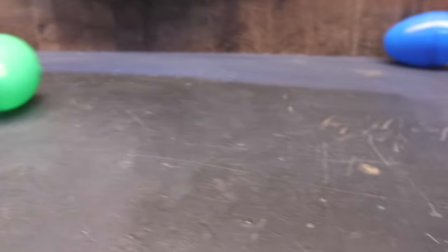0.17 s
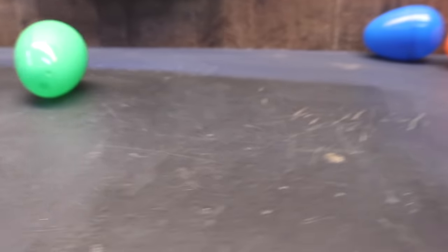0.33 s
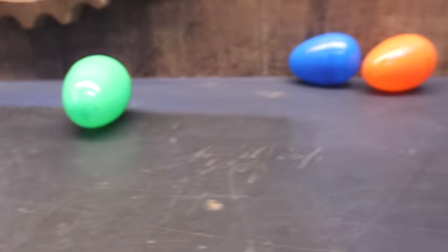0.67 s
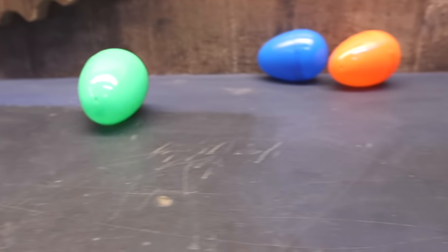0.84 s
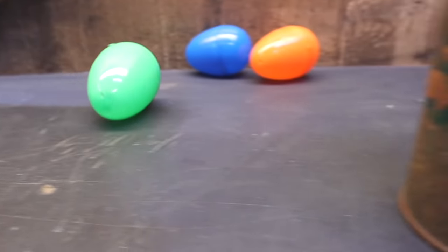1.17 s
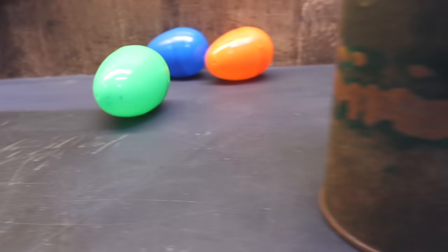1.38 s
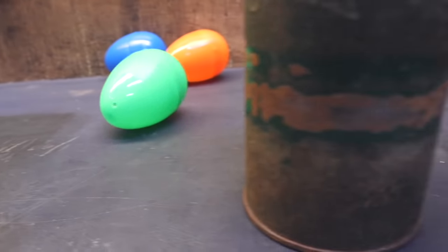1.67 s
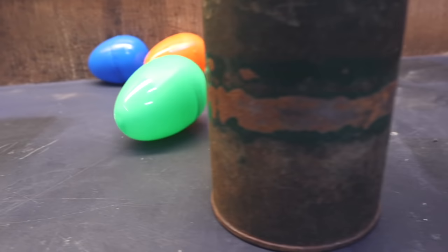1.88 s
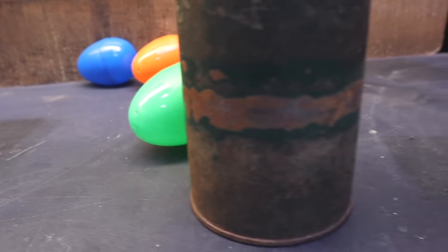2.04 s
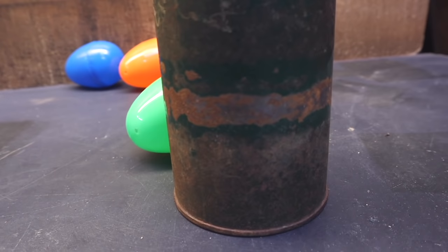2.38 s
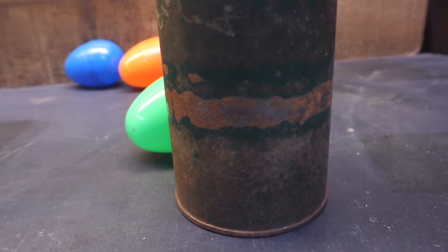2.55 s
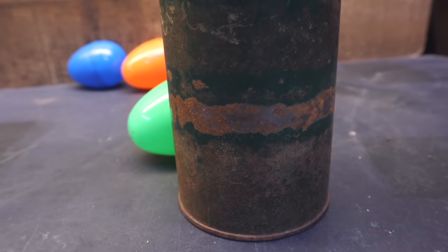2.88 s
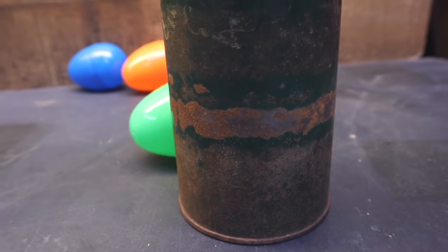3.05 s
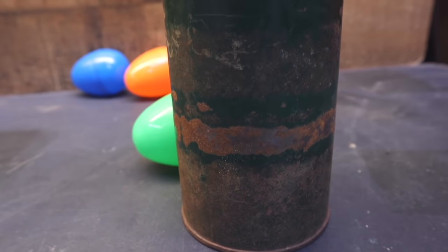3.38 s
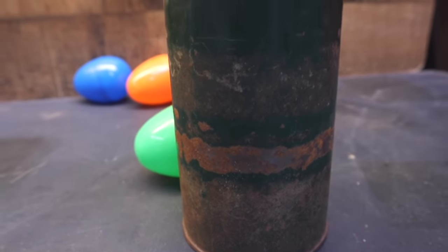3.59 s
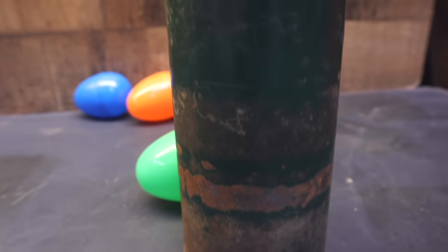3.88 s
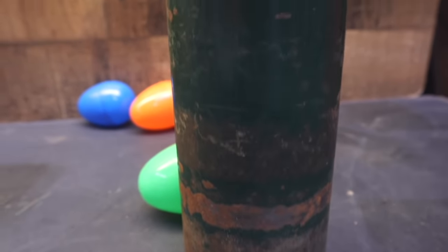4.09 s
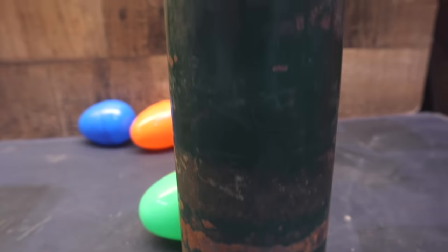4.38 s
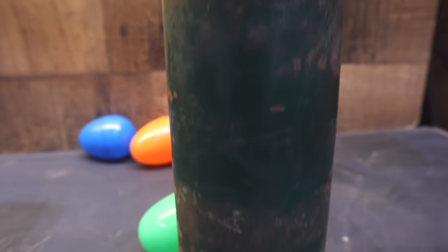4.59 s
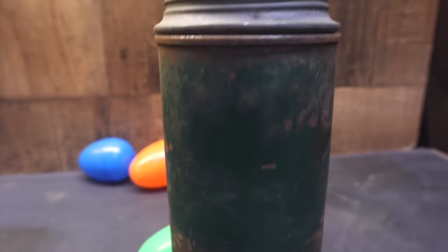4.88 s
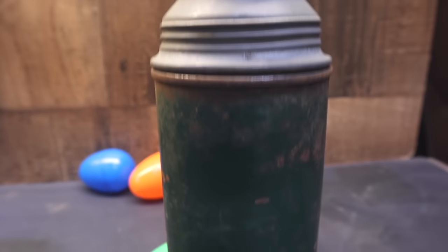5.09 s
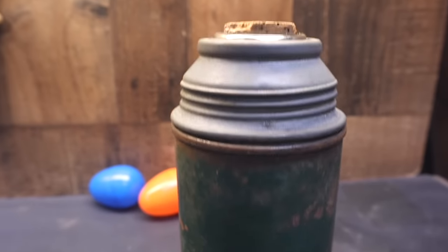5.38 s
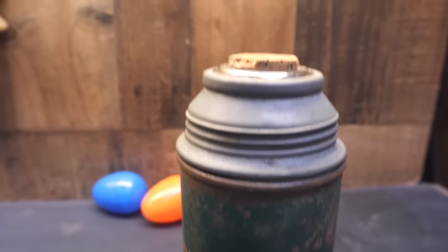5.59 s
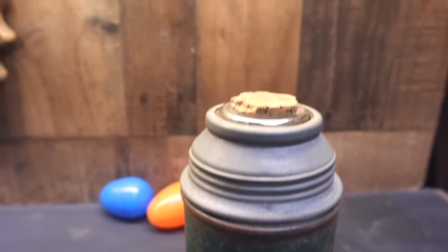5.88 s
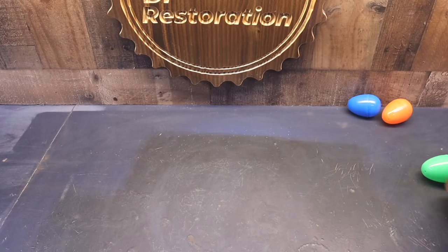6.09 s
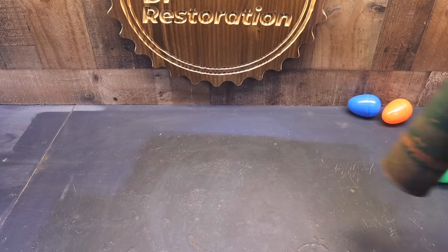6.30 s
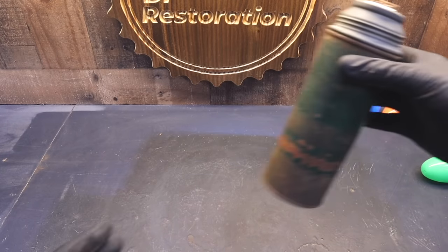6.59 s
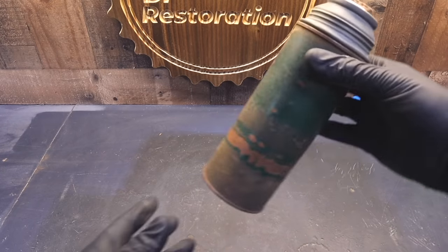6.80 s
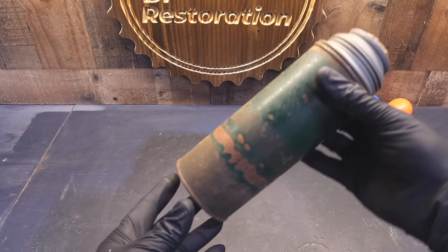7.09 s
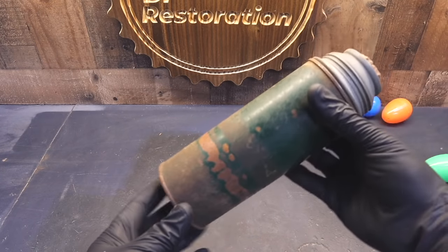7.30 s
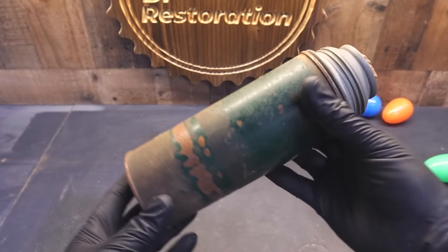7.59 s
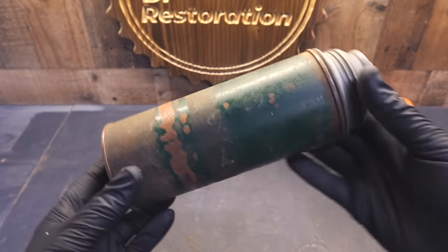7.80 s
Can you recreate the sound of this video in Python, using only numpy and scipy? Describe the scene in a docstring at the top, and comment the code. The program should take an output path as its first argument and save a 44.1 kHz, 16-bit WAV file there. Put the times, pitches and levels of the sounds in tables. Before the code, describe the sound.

Close to a small stereo microphone in a workshop, rubber gloves and a grip snap and tick crisply over low lumpy handling noise and dull bench knocks. After two seconds it thins to steady low rumble with rare clicks. Near the end a faraway engine speeds up while a steel flask is lightly tapped, rubbed and sharply slapped.

```python
"""Workshop bench: a rusty steel flask is handled with rubber gloves, close to a small stereo microphone. Glove
and grip snap (tick clusters, treble rings) and rustle (noise grains); soft low knocks thud now and then. Taps,
rubs and a slap drive the ringing modes of the steel; a noise echo tail answers the near sounds. Shaped noise
gives lumpy lows and room rumble; a far engine, one gliding tone, speeds up near the end. Above the bass the
sides outweigh the middle."""
import sys
import numpy as np
from scipy import signal
from scipy.fft import rfft, irfft
from scipy.io import wavfile
from scipy.ndimage import uniform_filter1d

SR = 44100
rng = np.random.default_rng(int(sys.argv[2]) if len(sys.argv) > 2 else 0)


def file_out(sig):
    """Save sig as 16-bit WAV at sys.argv[1]."""
    # one column per channel
    cols = np.atleast_2d(sig).T
    # limit, then scale
    lim = np.clip(cols, -1, 1)
    pcm = np.round(lim * 32767).astype(np.int16)
    wavfile.write(sys.argv[1], SR, pcm)


N = 350152

# room noise, middle: [f/Hz, relative density/dB per Hz]
ROOM_SPECTRUM = [(12, -24), (30, -10), (48, -1), (75, -2.5), (105, -11), (125, -12.5), (160, -22),
                 (250, -33), (450, -46.5), (1000, -54.5), (3000, -64), (8500, -77.5), (11500, -73),
                 (14000, -85.5)]
# room noise, side re middle: [f/Hz, level/dB]
ROOM_SIDE = [(60, -29.5), (110, -19), (200, -5), (500, 2), (1500, 4.5), (10000, 8)]
# hands shift on the mount: [t/s, level/dB]
SHIFT_CURVE = [(0, -52.5), (.2, -56.5), (.35, -42.5), (.5, -49.5), (.8, -54), (.88, -49), (1.0, -59.5),
               (2.1, -63.5)]
# strokes of rubber and cloth: [hold start t/s, hold/s, level/dB, lower-treble body re level/dB,
# grain spread/dB]
RUSTLE_STROKES = [(0, 0.031, -62, -4.5, 9.5), (.22, 0.059, -57, -13.5, 3.5), (.59, 0.036, -62.5, -12, 9),
                  (.89, 0.021, -66, -13, 4), (1.19, 0.13, -72.5, -8, 9), (1.42, 0.81, -79, -2, 16.5),
                  (2.225, 0.011, -67, -2, 5), (4.89, 0.038, -80, 0.5, 0), (5.05, 2.89, -89, 1, 3),
                  (6.27, 0.24, -81.5, -1, 1), (6.74, 0.097, -75, 0, 1), (7.09, 0.018, -64, -8.5, 5),
                  (7.15, 0.049, -57, -11.5, 0), (7.5, .1, -73, -4, -2), (7.625, 0.1, -67.5, -2.5, 3),
                  (7.755, 0.023, -63, 0, -2), (7.86, 0.073, -60, -2.5, -0.5)]
# snaps of glove and grip: [t/s, reference level/dB, lower-treble body re reference/dB]
SNAP_EVENTS = [(0.064, -41.5, -30), (0.0794, -30.5, -13), (0.0962, -34.5, -18), (0.142, -46, -22),
               (0.207, -36.5, -18), (0.333, -48, -4), (0.3483, -36, -9), (0.3793, -56, 3),
               (0.3912, -47, -29), (0.406, -50, -16), (0.415, -47, -12), (0.4219, -32.5, -16.5),
               (0.455, -48.5, -8), (0.542, -59.5, 1), (0.5719, -32, -15.5), (0.591, -39, -20),
               (0.5977, -42, -18), (0.618, -44, -35), (0.7137, -37, -13.5), (0.739, -45, -11),
               (0.768, -46, -15), (0.772, -42, -18), (0.8007, -38, -9), (0.807, -46, -26), (0.825, -45, -8),
               (0.8721, -41.5, -10.5), (0.892, -46.5, -10), (0.9624, -52, -14), (0.981, -52, -20),
               (1.1753, -52.5, -10.5), (1.1935, -48, -19), (1.296, -51.5, -2), (1.34, -49, -15),
               (1.522, -50, -20), (1.544, -45.5, -13.5), (1.711, -38.5, -18), (1.84, -50.5, -6),
               (2.067, -50, 1), (2.075, -42.5, -7), (2.1104, -52.5, -14), (2.213, -53.5, 1),
               (2.9543, -59.5, 0.5), (4.7244, -46.5, -7), (4.8547, -61, 6), (5.358, -64, 6),
               (5.3688, -39.5, -12), (5.473, -64, 8), (5.482, -48, -1.5), (6.2193, -56.5, -6),
               (6.2894, -51.5, -19), (6.313, -51, -13), (6.556, -57.5, -12), (7.0666, -54.5, -6),
               (7.1664, -35, -1), (7.17, -31.5, -25), (7.306, -56, -10)]
# treble colour of snaps and rustle: [f/Hz, relative density/dB per Hz]
TREBLE_COLOUR = [(2500, -25.5), (3600, -36), (4300, -20), (6900, -5), (8500, -7.5), (10700, 0.5),
                 (13200, -4), (14300, -18.5), (16400, -23)]
# small hard part heard in lone snaps: [f/Hz, level in sharp click/dB, level in soft click/dB]
HARD_PART_MODES = [(950, -4, -20), (2050, -11, -3), (2850, -7, 2), (3900, 0, -13), (4850, 0, -2),
                   (8500, -5, -5), (11600, 0, 0)]
# soft low knocks: [t/s, gain/dB, rattle re gain/dB]
SOFT_KNOCKS = [(0.284, -51, 9.5), (0.336, -39, -12), (0.348, -36.5, -12), (0.438, -35.5, -14),
               (0.557, -40.5, -11), (0.801, -51, 1), (0.839, -48.5, 2), (0.869, -40, -4.5),
               (1.162, -47, -3.5), (1.625, -52, 1.5), (2.2104, -32.5, -9.5), (2.236, -47, 5.5),
               (2.504, -54, -2.5), (2.951, -41, -16), (3.102, -55, -7), (4.1, -50, 0.5), (5.48, -48, -1),
               (7.166, -51, 5), (7.344, -52, 1)]
# blows that set a thin object on the bench ringing: [t/s, level/dB, share of free ring time]
RINGING_BLOWS = [(2.225, -55, 0.36), (2.237, -63, .8), (2.953, -61, 1.1), (4.995, -71.5, 0.66)]
# modes of that object: [f/Hz, level/dB, free t60/s]
THIN_OBJECT_MODES = [(635, -8, .14), (802, 1, .3), (1365, 1, .16), (1680, -10, .3), (2116, -6, .1),
                     (2750, -4, .1), (3230, -4, .08)]
# far engine: [t/s, firing f/Hz, level/dB]
ENGINE_CURVE = [(5.45, 49.76, -38.5), (5.62, 52, -39.5), (5.9, 68.25, -50), (6.15, 76.15, -38),
                (6.4, 86.32, -45.5), (7.94, 91, -44.5)]
# modes of the steel wall: [f/Hz, level/dB]
FLASK_MODES = [(1095, -1), (1355, -1), (1530, -3), (2055, -5), (2150, -4), (2955, 0), (3025, -4), (4192, 0),
               (4975, -7), (5500, -7), (6360, -5), (6920, -6), (7250, -5)]
# fingertips on the wall: [t/s, force/dB]
TAP_EVENTS = [(6.287, -74), (6.312, -74), (6.351, -74.5), (6.435, -76), (6.555, -72.5), (7.005, -75),
              (7.061, -83), (7.087, -64), (7.126, -66.5)]
# glove dragged along the wall: [hold start t/s, hold/s, force/dB]
RUB_STROKES = [(6.437, .12, -112), (7.013, 0.12, -101), (7.703, 0.21, -110), (7.862, 0.079, -100)]

ROOM_NOISE_DB = -38.5      # rms of the middle
GRAINS_PER_S, RUSTLE_TOP_HZ = 3900, 12860
STROKE_RISE_DB_PER_S, STROKE_FALL_DB_PER_S = 288.5, 239
# rubber settling after a snap: level re snap, body re level, grain spread
SETTLE_DB, SETTLE_BODY_DB, SETTLE_SPREAD_DB = -36, -12.5, 6
# side re middle
NEAR_SIDE_DB, RUSTLE_SIDE_DB, KNOCK_SIDE_DB, TICK_SIDE_DB = 1, 4, -14.5, 6
# re snap reference; satellites are further scattered down
TICK_DB, HISS_DB, SATELLITE_DB = 10, -6, -15.5
HISS_T60_S, LONE_HISS_T60_S = 0.022, 0.022 / 3
# while the hands rest a snap comes nearly alone
LONE_FROM_S, LONE_TO_S = 2.5, 5.8
LONE_SNAP_DB, LONE_SATELLITE_DB = -10, -20
SNAP_RING_T60_S, SNAP_RING_DB, SNAP_SPREAD_DB = 0.0034, -16.5, 7
HARD_PART_CYCLES, SOFT_BELOW_DB = 25, -55
FLASK_T60_S = 0.09
TAP_SPREAD_DB, GRIP_WANDER_DB = 3, 3      # standard deviations
SLAP_S, SLAP_DB, CRACK_DB, CRACK_T60_S = 7.167, -40.5, -25, 0.067
ECHO_T60_S, ECHO_DB, WALL_CUT_HZ = 0.076, -14, 3900
OFFSET, STOPBAND_HZ = 0.0018, 16500      # offset in full scale


def from_db(db):
    """Decibels to gain."""
    return 10 ** (np.asarray(db) / 20)


def rms_one(x):
    """Scale to rms 1."""
    return x / np.sqrt(np.mean(x ** 2) + 1e-20)


def in_time(rows):
    """Columns of a curve at every sample, and a mask of the time it covers."""
    s, *columns = np.transpose(rows)
    t = np.arange(N) / SR
    return [np.interp(t, s, c) for c in columns] + [(t >= s[0]) & (t <= s[-1])]


def at_hz(hz, points):
    """Level of a (Hz, dB) curve, interpolated over log frequency."""
    points_hz, points_db = np.transpose(points)
    return np.interp(np.log(hz), np.log(points_hz), points_db)


def filtered(x, order, edge_hz, kind="low"):
    """Causal Butterworth filter."""
    return signal.sosfilt(signal.butter(order, edge_hz, kind, fs=SR, output="sos"), x)


def colour(x, points):
    """Short causal filter whose gain follows (Hz, dB) points; white rms 1 stays rms 1."""
    level_db = at_hz(np.linspace(1, SR / 2, 257), points)
    cepstrum = irfft(np.log(from_db(np.maximum(level_db, -70))))
    cepstrum[1:256] *= 2      # minimum phase: fold the cepstrum forward
    cepstrum[257:] = 0
    taps = irfft(np.exp(rfft(cepstrum)))[:200]
    return signal.lfilter(taps / np.sqrt(np.sum(taps ** 2)), [1], x)


def body_band(x, top_hz):
    """The lower treble; white rms 1 stays near rms 1."""
    return 2.0 * filtered(x, 2, [1300, top_hz], "band")


def ring(clicks, hz, t60_s):
    """Two-pole resonator: a unit click sets a dying sine of height 1 ringing."""
    r, w = from_db(-60 / (t60_s * SR)), 2 * np.pi * hz / SR
    return signal.lfilter([0, np.sin(w)], [1, -2 * r * np.cos(w), r * r], clicks + 1e-18)


def left_right(mid_side, side_db):
    """Middle plus and minus the side."""
    mid, side = mid_side[0], from_db(side_db) * mid_side[1]
    return np.array([mid + side, mid - side])


def swell(start_s, hold_s, level_db):
    """Gain of one movement: rises up to its start, holds and dies away at set rates."""
    t = np.arange(N) / SR
    rise_db = STROKE_RISE_DB_PER_S * np.maximum(start_s - t, 0)
    fall_db = STROKE_FALL_DB_PER_S * np.maximum(t - start_s - hold_s, 0)
    return from_db(level_db - rise_db - fall_db)


def room_noise():
    """Steady rumble falling to a faint hiss; middle and side are unrelated noises."""
    hz = np.maximum(np.arange(N // 2 + 1) * SR / N, 1)
    mid_db = at_hz(hz, ROOM_SPECTRUM)
    side_db = mid_db + at_hz(hz, ROOM_SIDE)
    white = rfft(rng.standard_normal((2, N)))
    both = irfft(white * from_db([mid_db, side_db]), N)
    return from_db(ROOM_NOISE_DB) * left_right(both / np.std(both[0]), 0)


def shifting():
    """Low noise in lumps of some ten milliseconds, alike in both sides."""
    level_db, on = in_time(SHIFT_CURVE)
    drift = signal.lfilter([1], [1, -.998], rng.standard_normal(N))
    lumps = from_db(3 * rms_one(drift))
    low = filtered(rng.standard_normal(N), 2, [125, 230], "band")
    return on * from_db(level_db) * rms_one(low * lumps)


def rustle():
    """Dense tiny slips of uneven size, each under a millisecond of noise, under the hands' movement."""
    moves = list(RUSTLE_STROKES)
    for s, level_db, _ in SNAP_EVENTS:
        if level_db > -47 and not LONE_FROM_S < s < LONE_TO_S:
            # rubber settles back with a dying rustle
            moves.append((s, 0, level_db + SETTLE_DB, SETTLE_BODY_DB, SETTLE_SPREAD_DB))
    total, body, spread = 1e-20, 0, 0
    for start_s, hold_s, level_db, body_db, spread_db in moves:
        power = swell(start_s, hold_s, level_db) ** 2
        total = total + power
        body = body + power * from_db(2 * body_db)
        spread = spread + power * spread_db
    size = np.minimum(rng.exponential(1, N), 4)
    slips = (rng.random(N) < GRAINS_PER_S / SR) * from_db(2 * spread / total * size)
    grain_power = signal.lfilter([1], [1, -.93], slips) + 1e-9
    # level evened over 50 ms
    grains = np.sqrt(grain_power / uniform_filter1d(grain_power, size=SR // 20))
    noise = rng.standard_normal((2, 2, N)) * grains
    treble = colour(np.sqrt(total) * noise[0], TREBLE_COLOUR)
    lower_treble = body_band(np.sqrt(body) * noise[1], top_hz=6660)
    return left_right(filtered(treble + lower_treble, 8, RUSTLE_TOP_HZ), RUSTLE_SIDE_DB)


def snaps():
    """Main tick, weaker ticks around it, faint hiss, own treble rings; a lone one rings a hard part."""
    ticks, hiss, body = np.zeros(N), np.zeros(N), np.zeros(N)
    age = np.arange(SR // 20) / SR
    part_hz, sharp_db, soft_db = np.transpose(HARD_PART_MODES)
    clicks, favour = np.zeros((len(part_hz), N)), np.zeros((10, N))
    for s, level_db, body_db in SNAP_EVENTS:
        i = round(s * SR)
        span = slice(i, i + len(age))
        alone = LONE_FROM_S < s < LONE_TO_S
        lone_db = LONE_SNAP_DB * alone
        lean = rng.standard_normal(10)
        ticks[i + 12] += from_db(level_db + TICK_DB + lone_db)

        part_db = soft_db if level_db < SOFT_BELOW_DB else sharp_db
        part_db = part_db + body_db * (part_hz < 5000) + 2 * lean[:len(part_hz)]
        clicks[:, i + 12] += alone * from_db(level_db + part_db)

        # six satellites, from 2.5 ms before to 10.5 ms after
        place, drop, sign = rng.random((3, 6))
        at = i + ((0.013 * place ** 2 - .0025) * SR).astype(int)
        satellite_db = level_db + TICK_DB + SATELLITE_DB + LONE_SATELLITE_DB * alone - 28 * drop
        ticks[at] += from_db(satellite_db) * np.sign(sign - .5)

        hiss_t60_s = LONE_HISS_T60_S if alone else HISS_T60_S
        hiss[span] += from_db(level_db + HISS_DB - 60 * age / hiss_t60_s)
        body_fall = from_db(level_db + body_db + lone_db - 60 * age / 0.012)
        body[span] += body_fall * np.minimum(age / 0.00067, 1)
        gains = from_db(SNAP_RING_DB) * rms_one(from_db(SNAP_SPREAD_DB * lean))
        favour[:, i - SR // 300:i + len(age)] = gains[:, None]

    ring_hz = np.geomspace(4500, 13500, 10)
    ticks = ticks + sum(ring(ticks * gain, hz, SNAP_RING_T60_S) for hz, gain in zip(ring_hz, favour))
    # side is the slope of the middle: left leads
    direct = np.array([ticks, from_db(TICK_SIDE_DB) * np.gradient(ticks)])
    noise = rng.standard_normal((2, 2, N))
    treble = colour(direct + hiss * noise[0], TREBLE_COLOUR)
    lower_treble = body_band(body * noise[1], top_hz=5100)
    part_t60_s = np.clip(HARD_PART_CYCLES / part_hz, .005, .025)
    hard = sum(ring(c, hz, t60_s) for c, hz, t60_s in zip(clicks, part_hz, part_t60_s))
    hard_to_right = hard * [[1], [-1]]
    return left_right(treble + lower_treble + hard_to_right, NEAR_SIDE_DB)


def knocks():
    """One push of a few milliseconds and a short low rattle; a few blows ring a thin object."""
    out, age = np.zeros((2, N)), np.arange(SR // 4) / SR
    push_envelope = from_db(-60 * age / 0.0088) * np.minimum(age / 0.00078, 1)
    push = 3.0 * np.sin(2 * np.pi * 330 * age) * push_envelope
    for s, gain_db, rattle_db in SOFT_KNOCKS:
        i = round(s * SR)
        dull = filtered(rng.standard_normal((2, len(age))), 2, [250, 1100], "band")
        knock = dull * from_db(rattle_db - 60 * age / 0.13) * np.minimum(age / 0.0065, 1)
        knock[0] += push
        out[:, i:i + len(age)] += knock * from_db(gain_db)
    for s, blow_db, share in RINGING_BLOWS:
        i = round(s * SR)
        for hz, mode_db, t60_s in THIN_OBJECT_MODES:
            out[0, i:i + len(age)] += from_db(blow_db + mode_db) * ring(age == 0, hz, share * t60_s)
    return left_right(out, KNOCK_SIDE_DB)


def engine():
    """Only the firing tone carries this far: one sine of gliding pitch and level."""
    hz, level_db, on = in_time(ENGINE_CURVE)
    fade = uniform_filter1d(on * 1., size=SR // 10)
    tone = np.sqrt(2) * np.sin(2 * np.pi * np.cumsum(hz) / SR)
    return fade * from_db(level_db) * tone


def flask(force):
    """The steel wall rings in its modes, nearer the right; one force for all modes or one for each."""
    force = np.broadcast_to(force, (len(FLASK_MODES), N))
    wall = sum(from_db(db) * ring(f, hz, FLASK_T60_S) for f, (hz, db) in zip(force, FLASK_MODES))
    return wall * np.array([[.72], [1.1]])


def taps():
    """Each tap strikes every mode of the wall with a strength of its own."""
    s, force_db = np.transpose(TAP_EVENTS)
    spread_db = TAP_SPREAD_DB * rng.standard_normal((len(s), len(FLASK_MODES)))
    force = np.zeros((len(FLASK_MODES), N))
    force[:, (s * SR).astype(int)] = from_db(force_db[:, None] + spread_db).T
    return flask(force)


def rubbing():
    """Uneven slips over the rust keep the wall's modes sounding; the moving grip favours some in turn."""
    slips = (rng.random(N) < 900.0 / SR) * rng.standard_normal(N)
    steps = rng.standard_normal((len(FLASK_MODES), N // 1024 + 2))
    wander = np.array([np.interp(np.arange(N) / 1024, np.arange(len(row)), row) for row in steps])
    force = sum(swell(*rub) for rub in RUB_STROKES) * rms_one(slips)
    return flask(force * from_db(GRIP_WANDER_DB * wander))


def slap():
    """A palm lands: flask modes near 2 kHz ring, the stretched rubber cracks high, to the right."""
    click = np.zeros(N)
    click[round(SLAP_S * SR)] = 1
    wall = flask(filtered(from_db(SLAP_DB) * click, 2, [2000, 2280], "band"))
    fall = signal.lfilter([1], [1, -from_db(-60 / (CRACK_T60_S * SR))], click)
    crack = filtered(fall * rng.standard_normal((2, N)), 2, [10000, 14000], "band")
    return wall + from_db(CRACK_DB) * left_right(crack, NEAR_SIDE_DB) * [[.8], [1.2]]


def workshop_echo(x):
    """Tail of decaying noise, different for each side, duller than the direct sound; fed by the left."""
    age = np.arange(int(.4 * SR)) / SR
    tail = rng.standard_normal((2, len(age))) * from_db(-60 * age / ECHO_T60_S) * (age > .003)
    tail = filtered(tail, 1, WALL_CUT_HZ)
    tail = left_right(tail / np.sqrt(np.sum(tail[0] ** 2)), NEAR_SIDE_DB)
    return from_db(ECHO_DB) * signal.fftconvolve(x[:1], tail, axes=1)[:, :N]


def scene():
    """Hands, bench and flask with their echo, over lumpy lows, room noise and the engine."""
    near = rustle() + snaps() + knocks() + taps() + rubbing() + slap()
    return near + workshop_echo(near) + room_noise() + shifting() + engine()


def record(dry):
    """A small steady offset; the top is cut."""
    return signal.sosfilt(signal.cheby2(12, 70, STOPBAND_HZ, fs=SR, output="sos"), dry + OFFSET)


dry = scene()
out = record(dry)
file_out(out)
```